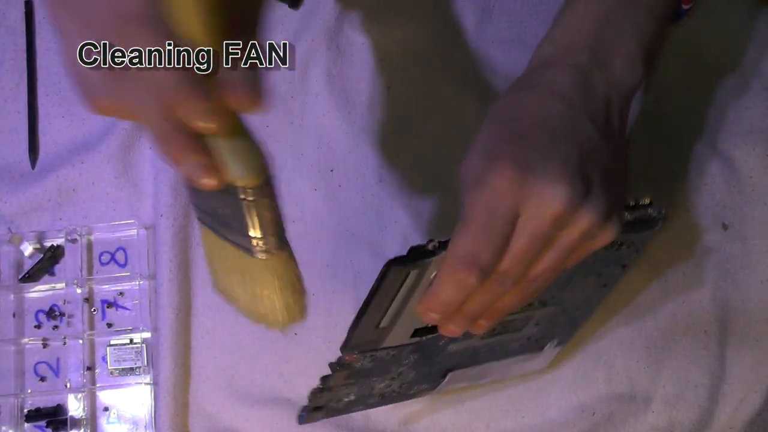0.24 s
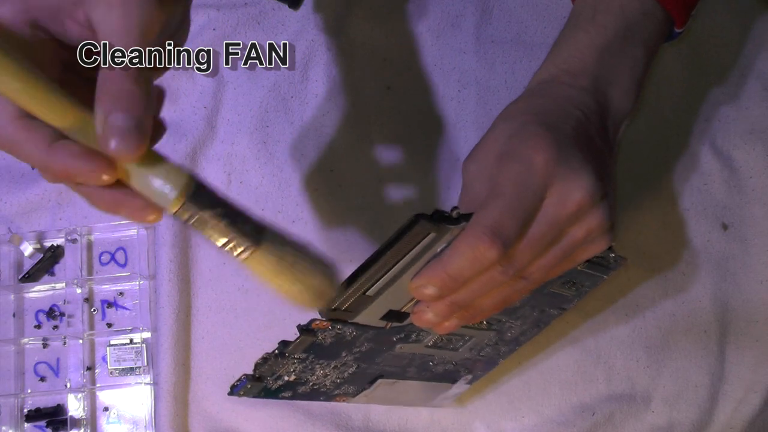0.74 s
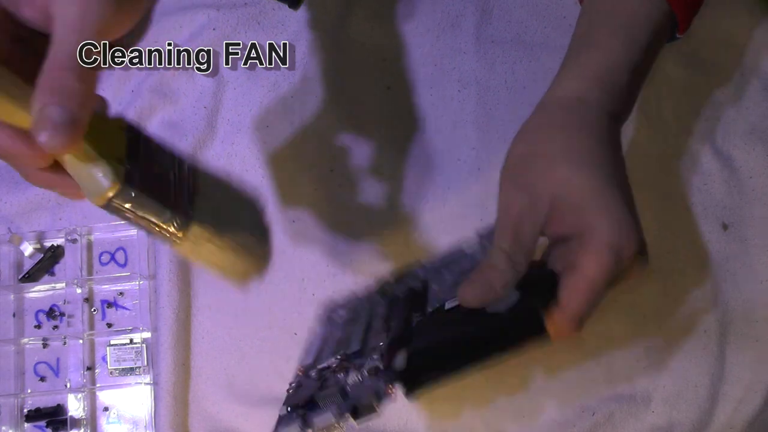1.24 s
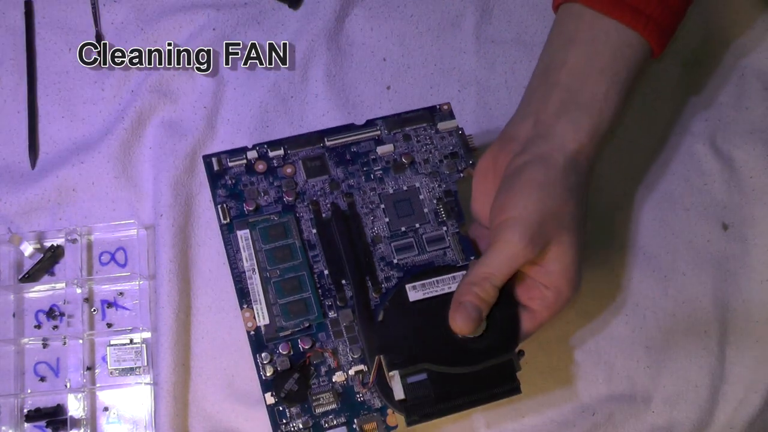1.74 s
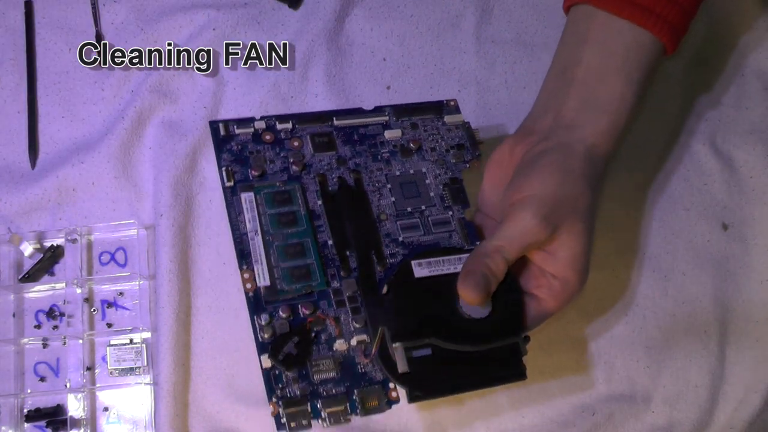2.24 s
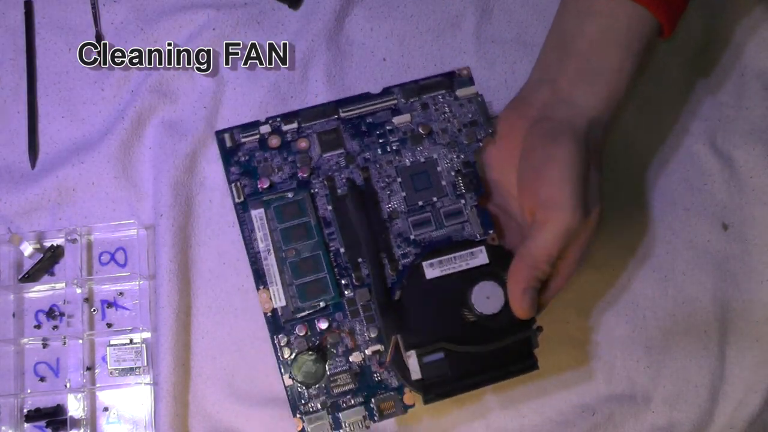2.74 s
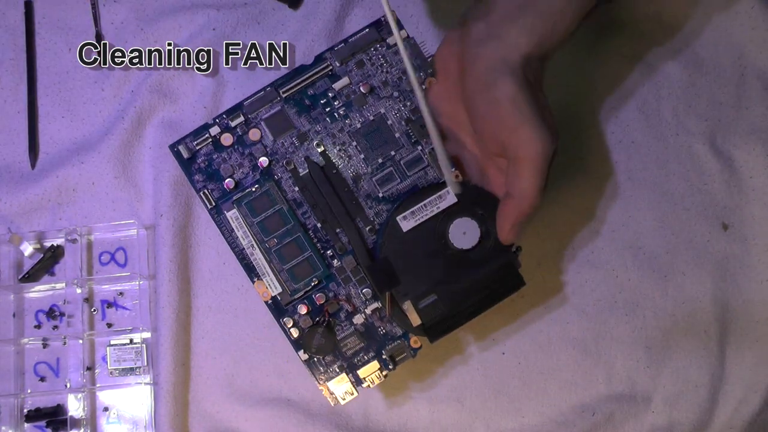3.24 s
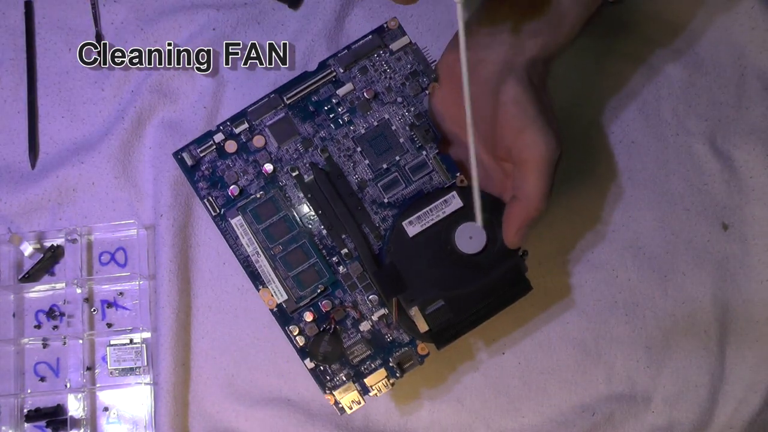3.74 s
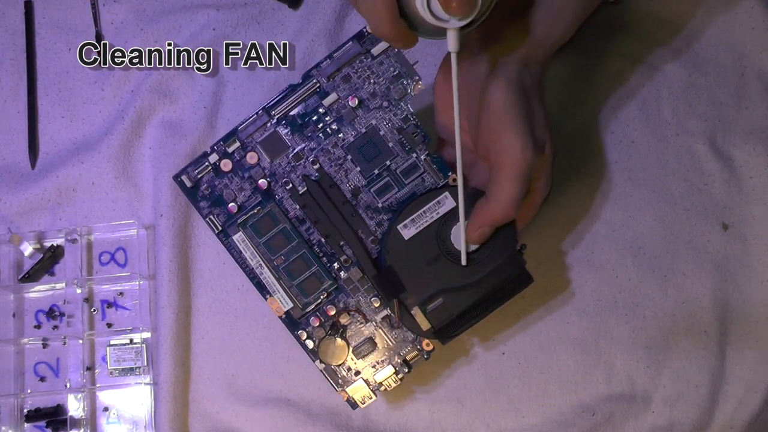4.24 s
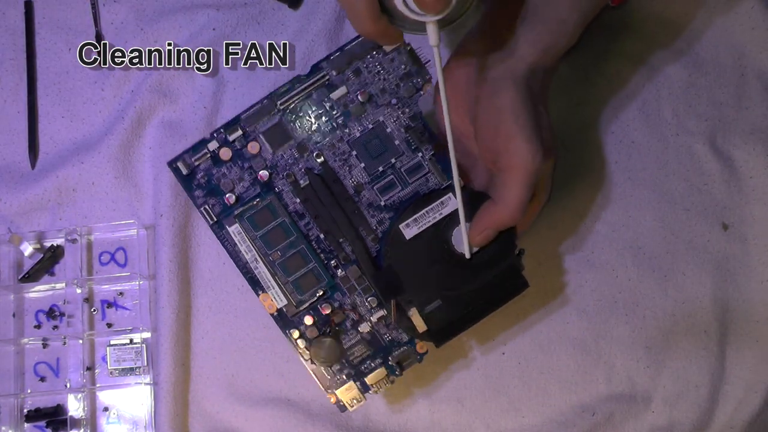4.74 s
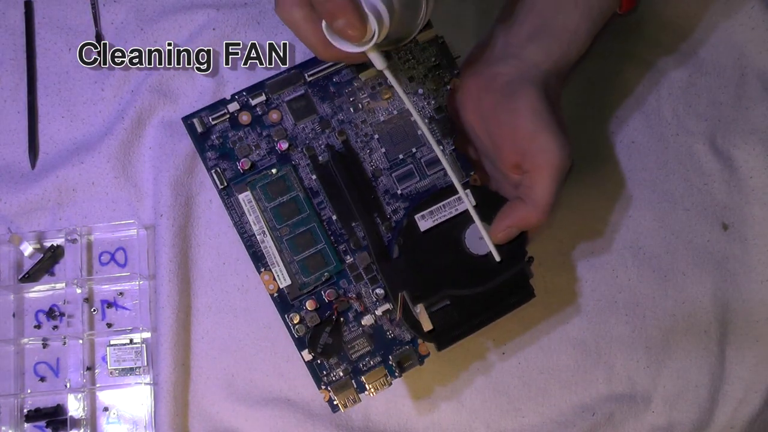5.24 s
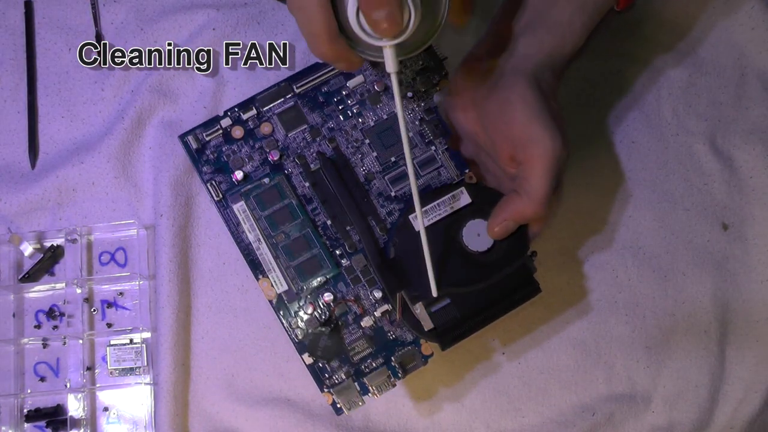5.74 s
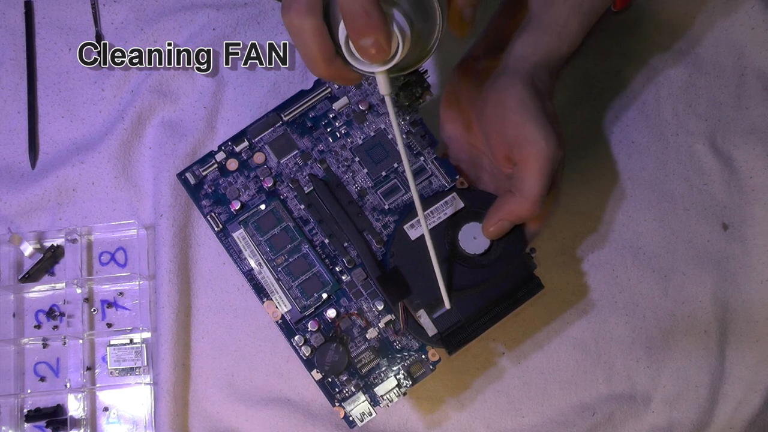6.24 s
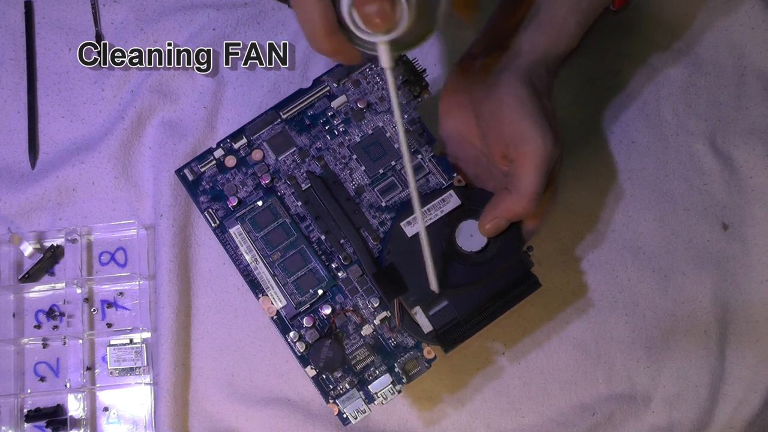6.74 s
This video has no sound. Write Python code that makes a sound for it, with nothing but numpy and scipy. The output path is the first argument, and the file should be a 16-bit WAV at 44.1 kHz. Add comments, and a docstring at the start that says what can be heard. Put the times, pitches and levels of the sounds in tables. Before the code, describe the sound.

Quick bristly scrubbing and small ticks, a clatter of a can on a bench, then five valve presses of bright, forceful air hiss in four bursts.

```python
"""Compressed air hisses in four bursts from a can's straw into a laptop cooling fan on a cloth-covered bench.
The jet is noise coloured by the hollows it points at; it whistles once and sets thin metal ringing.
First a paintbrush scrubs the fins (grainy friction noise and taps) and the can is picked up with knocks
(damped modes and noise). Ticks of can and straw, finger friction, a coasting rotor, low gusts of spent air
and quiet room noise with hum fill in the rest, in a small, nearly mono room."""
import sys
import numpy as np
from scipy import signal
from scipy.fft import rfft, irfft, next_fast_len
from scipy.io import wavfile
from scipy.ndimage import map_coordinates

SR = 44100
rng = np.random.default_rng(int(sys.argv[2]) if len(sys.argv) > 2 else 0)


def digitize_waveform(pressure):
    """Quantize a signal to 16-bit integers and store it at the path in sys.argv[1].

    Rows of a 2-D input are taken as channels; values are limited to [-1, 1].
    """
    field = np.atleast_2d(pressure).T
    bounded = np.clip(field, -1, 1)
    quanta = np.round(bounded * 32767).astype(np.int16)
    wavfile.write(sys.argv[1], SR, quanta)


N = 308700
TIME = np.arange(N) / SR
# Levels in the tables are relative: each source trims them further.

# Room noise: (frequency [Hz], density [dB per Hz])
AIR = [(30, -14), (150, -2.9), (230, -3.9), (420, 0.0), (740, -1.3), (1000, -4.6), (1700, -9.7),
       (2700, -8.7), (4000, -13.3), (5400, -11.7), (7500, -14.5), (10000, -19.1), (15800, -22.5)]
# Stereo width of the room noise: (frequency [Hz], side minus mid [dB])
AIR_WIDTH = [(60, -9.5), (180, -0.5), (550, -3), (1650, -6), (4970, -26), (15000, -16.5)]
AIR_DB = -62
# Hum of bench equipment: (frequency [Hz], rms level [dB])
HUM = [(84, -74.5), (2684, -83)]
# Decay of the room's tail: (frequency [Hz], t60 [s])
ROOM_DECAY = [(150, .22), (800, .19), (3000, .17), (9000, .16), (16000, .14)]
TOP_HZ = 16020  # upper limit of the whole sound

# Held board shifts on the cloth: (time [s], level [dB])
BUMPS = [(1.878, -55), (1.898, -58), (2.929, -60.5), (2.98, -57), (6.055, -55.5)]
# Gusts of spent air reach the microphone: (time [s], level [dB])
PUFFS = [(3.608, -55), (3.788, -62), (3.838, -59.5), (4.385, -53), (4.925, -62), (5.275, -58), (5.668, -65),
         (6.86, -59)]
# Rotor rubs as it coasts: (time of hardest rub [s], lead-in [s], level [dB])
COAST = [(4.06, 0.067, -61), (5.026, 0.041, -65.5), (5.08, 0.025, -62.5), (5.13, 0.022, -68)]
# Colour of the rotor's rub: (frequency [Hz], density [dB per Hz])
ROTOR = [(1180, -37.5), (2000, -1), (2550, -16.5), (2830, -11), (5550, -7), (6240, 1), (7640, -3),
         (9120, -10), (11000, -10), (15000, -19)]
# Fingers shift their grip on the can: (time of hardest push [s], lead-in [s], level [dB])
GRIP = [(2.723, .01, -51), (2.944, 0.044, -59), (3.04, .03, -57), (3.125, .04, -57.5), (3.16, .01, -60),
        (3.245, .02, -59), (3.394, 0.033, -55), (3.425, 0.014, -59)]
# Colour of skin on the can: (frequency [Hz], density [dB per Hz])
SKIN = [(2650, -25), (4500, -4), (5000, -1.5), (7070, -14), (7770, 5.5), (8450, -2), (9740, -9),
        (10500, -1), (11600, -5), (15100, -7), (15800, -10)]
PING_S = 3.418  # the can sounds one clear note

# Can slides out over the cloth: (time of hardest push [s], lead-in [s], level [dB])
SLIDES = [(2.4, 0.0056, -39.5), (2.487, .025, -47), (2.56, 0.028, -42), (2.66, 0.019, -50.5),
          (2.712, 0.05, -53)]
# Can knocks on the bench: (time [s], thud of the bench [dB], crack of the contact [dB])
KNOCKS = [(2.393, -32, -34.5), (2.411, -34.5, -47), (2.438, -43, -61), (2.486, -31, -25.5),
          (2.502, -26, -30), (2.542, -41, -27), (2.576, -33.5, -33.5), (2.592, -25.5, -22),
          (2.604, -32.5, -24), (2.624, -36.5, -32.5), (2.652, -36, -46), (2.706, -47, -59)]
# Modes of can and bench together: (frequency [Hz], strength [dB], t60 [s])
BENCH = [(150, -9, 0.038), (192, -3, 0.036), (356, -2.5, 0.076), (418, 3.5, 0.05), (508, -4.5, 0.12),
         (619, -9.5, 0.079), (705, -12.5, 0.17), (785, -4.5, .1), (857, 1.5, 0.07), (1134, 0, 0.031),
         (1245, -8, 0.055), (1375, -7.5, 0.052), (1730, -9, 0.032), (2006, 0, 0.041), (2300, -2, 0.029),
         (2686, -0.5, 0.025), (2990, -19, 0.044), (3510, -28.5, 0.37), (4930, -6, 0.13)]
# Modes of the can's wall: (frequency [Hz], strength [dB], t60 [s])
CAN_WALL = [(3450, -1, 0.25), (4990, 3, 0.059), (8200, -14, 0.05), (10700, -6, 0.053)]
# Can and straw tick when handled or touching the housing: (time [s], level [dB], brightness [dB])
TICKS = [(2.284, -69.5, -9), (2.319, -63, -5.5), (2.7284, -57, 4), (2.8194, -61.5, -1.5), (2.9805, -53, -1),
         (3.393, -52.5, -3), (3.416, -59.5, -1), (5.8336, -45.5, -.5), (5.977, -57.5, -9),
         (6.0443, -47.5, 1), (6.0526, -47.5, -6), (6.282, -41.5, 11)]
# Modes of fan housing and straw: (frequency [Hz], strength [dB], t60 [s])
HOUSING = [(1300, -10, .05), (1800, -13, .03), (2700, -12, .07), (3330, -13, .03), (4550, -11, .03),
           (5020, -10, .04), (6250, -9, .03), (7950, -12, .03), (9100, -11, .03), (10400, -8, .025)]
SNAP_T60, HOUSING_DB = .03, -3  # decay of a tick's noise [s], gain of the housing's ring

# Brush strokes across the fins: (time of hardest push [s], lead-in [s], level [dB])
STROKES = [(.04, 0.0028, -47.5), (.085, 0.028, -50.5), (.229, 0.032, -44.5), (.357, .04, -54.5),
           (.472, 0.026, -48), (.606, 0.049, -52.5), (.722, 0.027, -46), (.828, 0.028, -47),
           (.944, 0.036, -51.5), (1.064, 0.02, -51.5), (1.173, 0.028, -49.5), (1.274, 0.028, -47)]
# Colour of the bristles: (frequency [Hz], density [dB per Hz])
BRISTLES = [(1180, -36), (2000, -12), (2750, -11.5), (2980, -13), (3420, -13), (3960, -14.5), (4470, -4.5),
            (5130, -7.5), (5410, -8), (9240, -9.5), (11900, -15), (15100, -17), (15800, -5.5)]
GRAIN_DB = 3.5  # spread of the tiny snaps in all friction
# Ferrule and stiff bristles catch on the fins: (time [s], level [dB])
TAPS = [(.039, -60), (.082, -41), (0.094, -54), (.204, -50.5), (.353, -57), (1.247, -57), (1.41, -46),
        (1.424, -54), (1.431, -46.5)]
# Colour of those catches: (frequency [Hz], density [dB per Hz])
FERRULE = [(1000, -26), (3500, -22), (4600, -4.5), (6300, -2.5), (8200, 1.5), (10000, -4), (11500, -15),
           (16000, -22)]

# Modes of thin metal in the jet: (frequency [Hz], strength [dB], t60 [s])
METAL = [(2772, -6, .8), (3565, -3, .9), (5216, 0, 1.5), (6040, 4, .9), (7520, -5, .6), (8030, 1, .5),
         (9320, -4, .65), (9491, -7, .4), (10020, -7, .45), (10455, -6, .55), (13770, -9, .5)]
# Start and end of the whistle: (time [s], time [s])
WHISTLE_S = (3.668, 3.716)
# Its pitch at start and end: (frequency [Hz], frequency [Hz])
WHISTLE_HZ = (1260, 2560)
# Presses of the valve, the second running into the third:
# (opens [s], shuts [s], attack [s], hiss [dB], draught [dB])
PRESSES = [(3.581, 3.846, .03, -21, -68), (4.112, 4.331, .052, -33.7, -74),
           (4.332, 4.814, 0.021, -22.5, -63), (5.241, 5.579, 0.038, -21.9, -66),
           (6.28, 6.87, .15, -23.5, -61.5)]
CREEP_DB_PER_S = 1  # the flow grows slowly while the valve is held
SHUT_S = 0.0052  # time constant of the closing valve
TURN_S = .012  # one aim blends into the next
# Hiss of the unobstructed jet: (frequency [Hz], density [dB per Hz])
FREE_JET = [(100, -23.5), (300, -13.5), (800, -15), (2000, -16.5), (3700, -13.5), (6000, -7.5),
            (9000, -0.5), (14000, 3), (16000, -6)]
# Hollows sounded at each aim: (frequency [Hz], width [Hz], peak on the free jet's scale [dB])
HUB = [(1510, 1600, 0), (2690, 990, 3.5), (4620, 750, 11), (7000, 2300, 15), (9800, 2260, 19),
       (11600, 245, 6), (12950, 290, 11.5), (15900, 7000, 1.5)]
BLADES = [(1410, 830, 20.6), (2480, 1800, 21.7), (4340, 1000, 23.3), (4730, 250.0, 32), (6920, 2300, 30.8),
          (9600, 2200, 28.8), (12350, 1400, 32.2), (14650, 1400, 33.4)]
RIM = [(1555, 730, 2.3), (2650, 3000, 4.3), (4440, 450, 5.6), (5160, 270, 11), (7640, 2400, 19),
       (10340, 2500, 29), (12200, 250.0, 20.7), (14100, 3000, 21)]
HALF_OPEN = [(700, 400.0, -14), (1470, 390, -15.5), (2860, 1100, -4.5), (3700, 290.0, -4.5),
             (8240, 4100, 3)]
INTAKE = [(1475, 680, 18.6), (2556, 1110, 26), (4850, 1120, 25), (5640, 210, 29.8), (6300, 240, 28),
          (7370, 2100, 25.4), (9880, 3440, 29.5), (13800, 2100, 26.6)]
EDGE = [(1490, 950, 12), (2502, 1070, 15.5), (4710, 1960, 16.8), (7060, 1930, 23), (7680, 190, 31),
        (8550, 1900, 25.2), (10980, 2900, 25.3), (14500, 2100, 23)]
COVER = [(1420, 490, -13.5), (2760, 750, -15), (4520, 630, -12), (8370, 360, 0.5), (12040, 270, 7.5)]
# The straw is moved: (time [s], hollows it points at, gain [dB])
AIMS = [(3.5, HUB, -.3), (3.68, BLADES, -4.5), (3.775, RIM, -0.25), (4.05, HALF_OPEN, 0.1),
        (4.332, INTAKE, -0.26), (5.1, EDGE, -0.8), (6.1, COVER, -1.9), (6.856, EDGE, 0.5)]


def amp(db):
    """Decibels to gain."""
    return 10 ** (np.asarray(db) / 20)


def unit(x):
    """Scale to rms 1."""
    return x / np.sqrt(np.mean(x ** 2) + 1e-20)


def along(points, hz):
    """Read a curve of (frequency, value) points on a log frequency axis."""
    f, v = np.transpose(points)
    return np.interp(np.log(hz + 1), np.log(f + 1), v)


def filtered(x, response):
    """Shape a sound by a gain that depends on frequency."""
    n = x.shape[-1]
    size = next_fast_len(n + 8192)
    spectrum = rfft(x, size) * response(np.fft.rfftfreq(size, 1 / SR))
    return irfft(spectrum, size)[..., :n]


def noise(spectrum):
    """Noise of rms 1, coloured by a (frequency, dB) curve."""
    return unit(filtered(rng.standard_normal(N), lambda hz: amp(along(spectrum, hz))))


def wobble(rate):
    """A smooth random curve with rate knots a second."""
    knots = rng.standard_normal(int(N * rate / SR) + 4)
    return map_coordinates(knots, [TIME * rate], order=2)


def ringing(modes, t, scatter_db):
    """Damped sine modes, with strength and polarity drawn afresh for each hit."""
    ring = np.zeros(len(t))
    for hz, db, t60 in modes:
        strength_db = db + scatter_db * rng.standard_normal()
        ring += amp(strength_db - 60 * t / t60) * np.sin(2 * np.pi * hz * t) * rng.choice([-1, 1])
    return ring


def voiced(hit, edges_hz, levels_db, size=512):
    """Split a hit into registers and set each one's rms over its first size samples."""
    out = np.zeros(len(hit))
    for low, high, db in zip(edges_hz, edges_hz[1:], levels_db):
        sos = signal.butter(4, [low, high], "band", fs=SR, output="sos")
        band = signal.sosfilt(sos, hit)
        out += amp(db) * band / np.std(band[:size])
    return out


def add(track, s, sound):
    """Lay a sound into a track at time s."""
    part = track[round(s * SR):][:len(sound)]
    part += sound[:len(part)]


def push(s, lead_s, touch_db, release_s, edge_s=.004):
    """Gain of one push: contact starts touch_db down, swells until time s, then lets go."""
    t = TIME - s
    contact = np.clip((t + lead_s) / edge_s + .5, 0, 1)
    swell = amp(touch_db * np.clip(-t / lead_s, 0, 1))
    return contact * swell * np.exp(-np.maximum(t, 0) / release_s)


def rub(strokes, spectrum, level_db, touch_db, release_s):
    """Friction: dense tiny snaps of uneven size, swelling with each stroke."""
    snaps = rng.standard_normal(N) * amp(GRAIN_DB * rng.standard_normal(N))
    scratch = unit(filtered(snaps, lambda hz: amp(along(spectrum, hz))))
    strength = sum(amp(db) * push(s, lead, touch_db, release_s) for s, lead, db in strokes)
    return amp(level_db) * scratch * strength


def valve(opens, shuts, attack_s):
    """Flow of one press: it builds up under the finger, creeps up slowly and is cut off."""
    rise = np.clip((TIME - opens) / attack_s, 0, 1) ** 1.02
    creep = amp(CREEP_DB_PER_S * (TIME - opens))
    return rise * creep * np.exp(-np.maximum(TIME - shuts, 0) / SHUT_S)


def in_room(x, wet_db, side_db, pan_db):
    """Centred direct sound plus a short noise tail in mid and side, then a left-right balance."""
    hz, t, z = signal.stft(rng.standard_normal((2, SR // 2)), SR, nperseg=256)
    decay = amp(-60 * t / along(ROOM_DECAY, hz)[:, None])
    onset = 1 - np.exp(-t / 0.003)
    tail = signal.istft(z * decay * onset, SR, nperseg=256)[1]
    tail = tail / np.linalg.norm(tail[0])
    mid, side = signal.fftconvolve(x[None], tail, axes=1)[:, :N]
    mid = x + amp(wet_db) * mid
    side = amp(side_db) * side
    balance = amp([[pan_db / 2], [-pan_db / 2]])
    return np.array([mid + side, mid - side]) * balance / np.sqrt(1 + amp(2 * wet_db))


def background():
    """Quiet room noise with the slightly unsteady hum of bench equipment."""
    hum = np.zeros(N)
    for hz, db in HUM:
        hum += amp(db) * np.sqrt(2) * np.sin(2 * np.pi * hz * TIME + .5 * wobble(5.5))
    mid = noise(AIR)
    side = filtered(noise(AIR), lambda hz: amp(along(AIR_WIDTH, hz)))
    return amp(AIR_DB) * np.array([mid + side, mid - side]) + hum


def thumps(events, band_hz, t60):
    """Dull, ringless pushes of decaying low noise."""
    track, t = np.zeros(N), np.arange(SR // 4) / SR
    for s, db in events:
        burst = amp(-60 * t / t60) * rng.standard_normal(len(t))
        add(track, s, voiced(burst, band_hz, [db], size=1024))
    return track


def rotor(chatter_hz=3000, width_hz=450, chatter_db=-4, flutter_db=4):
    """The coasting rotor rubs softly and chatters unevenly on its bearing."""
    whirr = rub(COAST, ROTOR, level_db=-1.5, touch_db=-8.5, release_s=0.016)
    low_hz, high_hz = chatter_hz - 3 * width_hz, chatter_hz + 3 * width_hz
    chatter_colour = [(low_hz, -35), (chatter_hz, 0), (high_hz, -35), (16000, -50)]
    chatter = rub(COAST, chatter_colour, level_db=chatter_db, touch_db=-15, release_s=0.051)
    return (whirr + chatter) * amp(flutter_db * wobble(70))


def ping(hz=960, t60=0.17, level_db=-51):
    """One soft, clear note of the can: a decaying sine."""
    t = np.maximum(TIME - PING_S, 0)
    return amp(level_db - 60 * t / t60) * np.sin(2 * np.pi * hz * t)


def drag(scuff_db=-23):
    """The can swishes over the cloth and its base scuffs the bench once: two colours of friction."""
    scuff = noise([(150, -30), (450, -13), (800, -0.5), (1350, -3), (1700, -13), (2050, -19),
                   (2600, -26), (9000, -31), (16000, -42)])
    cloth = [(300, 3.0), (1500, 4.0), (4000, -7.5), (7500, 1.5), (11000, -8.0), (16000, -12)]
    swish = rub(SLIDES, cloth, level_db=0.0, touch_db=-12, release_s=0.026)
    return swish + amp(scuff_db) * scuff * push(2.488, lead_s=0.037, touch_db=-35, release_s=0.0061)


def knocks(crack_db=3, crack_t60=0.087, thud_db=1, body_db=0, clack_db=-9.0, sizzle_db=-21,
           can_db=-24, rumble_db=-30):
    """The can rocks against the bench as it is lifted: a crack, the bench's thud and the can's thin ring."""
    track, t = np.zeros(N), np.arange(SR // 2) / SR
    for s, thud, contact in KNOCKS:
        crack = amp(crack_db - 60 * t / crack_t60) * rng.standard_normal(len(t))
        hit = ringing(BENCH, t, scatter_db=4.5) + crack
        levels_db = [thud + rumble_db, thud + thud_db,
                     contact + body_db, contact + clack_db, contact + sizzle_db]
        hit = voiced(hit, [40, 145, 600, 1600, 3400, 11000], levels_db)
        can_ring = amp(contact + can_db) * ringing(CAN_WALL, t, scatter_db=6)
        add(track, s + .002, hit + can_ring)  # just after the listed time
    return track


def snap(levels_db):
    """A dry noise snap of light, hard parts with a brief housing ring; levels for low, middle and top."""
    t = np.arange(SR // 10) / SR
    contact = amp(-60 * t / SNAP_T60) * rng.standard_normal(len(t))
    hit = contact + amp(HOUSING_DB) * ringing(HOUSING, t, scatter_db=6)
    return voiced(hit, [1000, 4500, 10800, 16000], levels_db)


def ticks(low_db=-3, middle_db=1.5, top_db=-5):
    """Can and straw tick; brightness lifts the top of each snap and lowers its low register."""
    track = np.zeros(N)
    for s, db, bright_db in TICKS:
        levels_db = [db + low_db - bright_db, db + middle_db, db + top_db + bright_db]
        add(track, s + 0.0016, snap(levels_db))  # just after the listed time
    return track


def taps(level_db=8, t60=0.027):
    """The brush catches on the fins: thin, decaying noise snaps, all of one colour."""
    blows = sum((TIME >= s) * amp(db - 60 * np.abs(TIME - s) / t60) for s, db in TAPS)
    return amp(level_db) * blows * noise(FERRULE)


def draught(lumps_db=3, level_db=-2, wash_db=2.0, swirl_db=2):
    """Spent air rumbles and washes over the bench in uneven puffs that follow the valve."""
    rumble = noise([(15, 6), (45, -5), (100, -14.5), (250, -13), (600, -42)])
    puffs = unit(rumble * amp(lumps_db * wobble(17)))
    wash = noise([(60, -7), (140, 5.5), (280, 5), (400, -7.0), (650, 2), (1500, 17.5), (4000, -59)])
    flow = sum(amp(db) * valve(opens, shuts, attack) for opens, shuts, attack, _, db in PRESSES)
    return (amp(level_db) * puffs + amp(wash_db) * wash) * flow * amp(swirl_db * wobble(14))


def release(level_db=-67):
    """The thin metal springs back and rings on when the jet lets go of it."""
    track, t = np.zeros(N), np.arange(SR) / SR
    for _, shuts, *_ in PRESSES:
        add(track, shuts, amp(level_db) * ringing(METAL, t, scatter_db=1.5))
    return track


def metal(drive, ring_db):
    """Thin metal picks up its own notes from the sound that shakes it, by convolution with its ring."""
    ring = ringing(METAL, np.arange(SR) / SR, scatter_db=1)
    return amp(ring_db) * signal.fftconvolve(drive, ring / np.linalg.norm(ring))[:N]


def whistle(wobble_rate=170, edge_s=.006, level_db=-35.0):
    """A breathy edge tone climbs as the jet catches the blades: a sine with shaky level and phase."""
    start, end = WHISTLE_S
    hz = np.exp(np.interp(TIME, WHISTLE_S, np.log(WHISTLE_HZ)))
    breath = 1 + 0.3 * wobble(wobble_rate)
    phase = 2 * np.pi * np.cumsum(hz) / SR + 0.45 * wobble(wobble_rate)
    gate = np.clip(np.minimum(TIME - start, end - TIME) / edge_s + .5, 0, 1)
    return amp(level_db) * unit(breath * np.sin(phase)) * gate


def aimed_hiss(hollows):
    """Turbulent noise of rms 1: the free jet's power plus a resonant peak for each hollow."""
    def response(f):
        power = amp(along(FREE_JET, f)) ** 2
        for hz, width, db in hollows:
            power = power + (amp(db) / (1 + (2 * (f - hz) / width) ** 2)) ** 2
        return np.sqrt(power)
    return unit(filtered(rng.standard_normal(N), response))


def jet(flutter_db=1.05, sputter_db=0.34):
    """Hiss from the straw: valve flow times noise that crossfades from aim to aim and flutters."""
    flow = sum(amp(db) * valve(opens, shuts, attack) for opens, shuts, attack, db, _ in PRESSES)
    reached = [np.clip((TIME - s) / TURN_S + .5, 0, 1) for s, _, _ in AIMS] + [0]
    hiss = np.zeros(N)
    for (_, hollows, gain_db), here, onward in zip(AIMS, reached, reached[1:]):
        share = np.sqrt(here * (1 - onward))
        hiss += amp(gain_db) * share * aimed_hiss(hollows)
    return flow * hiss * amp(flutter_db * wobble(45) + sputter_db * wobble(500))


def scene():
    """All sources on the bench, heard in the same small room."""
    handling = knocks() + drag() + thumps(BUMPS, band_hz=[150, 560], t60=0.052)
    gusts = draught() + thumps(PUFFS, band_hz=[20, 110], t60=0.093)
    fingers = rub(GRIP, SKIN, level_db=0.5, touch_db=-7, release_s=0.033) + ping()
    brush = rub(STROKES, BRISTLES, level_db=0.0, touch_db=-7.5, release_s=.0155) + taps()
    clicks = ticks()
    light = brush + fingers + rotor() + clicks + metal(clicks, ring_db=-24)
    hiss = jet()
    air = hiss + whistle() + metal(hiss, ring_db=-38) + release()
    handling_heard = in_room(handling, wet_db=-11.5, side_db=-21, pan_db=2.0)
    gusts_heard = in_room(gusts, wet_db=-12, side_db=-4, pan_db=.4)
    light_heard = in_room(light, wet_db=-11, side_db=-20, pan_db=0)
    jet_heard = in_room(air, wet_db=-11, side_db=-17.5, pan_db=.2)
    return background() + handling_heard + gusts_heard + light_heard + jet_heard


def record(dry):
    """The treble rolls off steeply around the upper band limit."""
    return filtered(dry, lambda hz: .5 - .5 * np.tanh((hz - TOP_HZ) / 120))


dry = scene()
out = record(dry)
digitize_waveform(out)
```